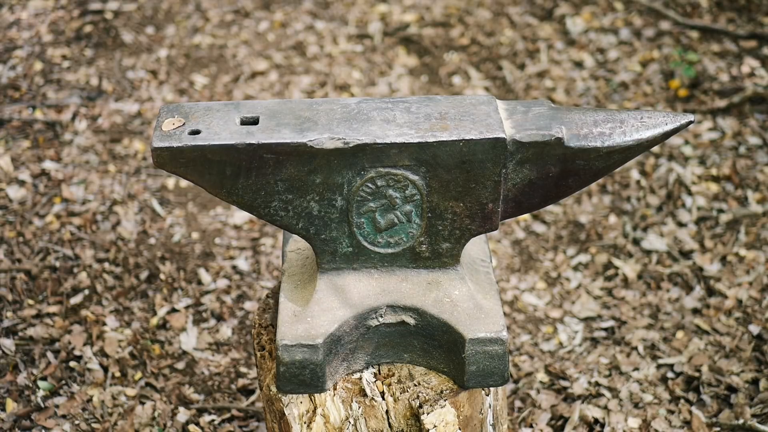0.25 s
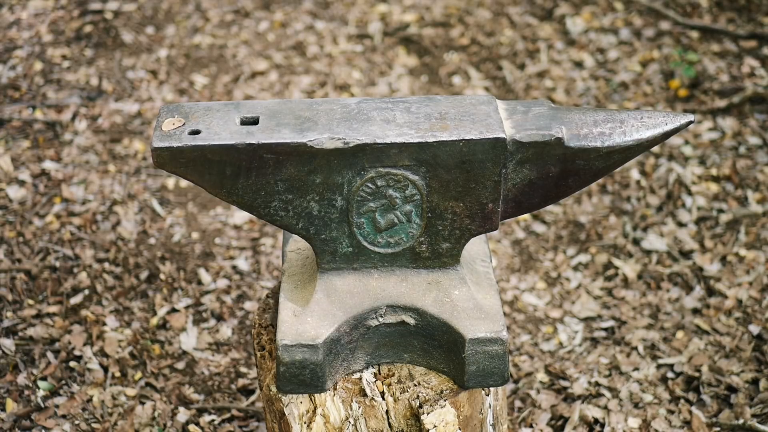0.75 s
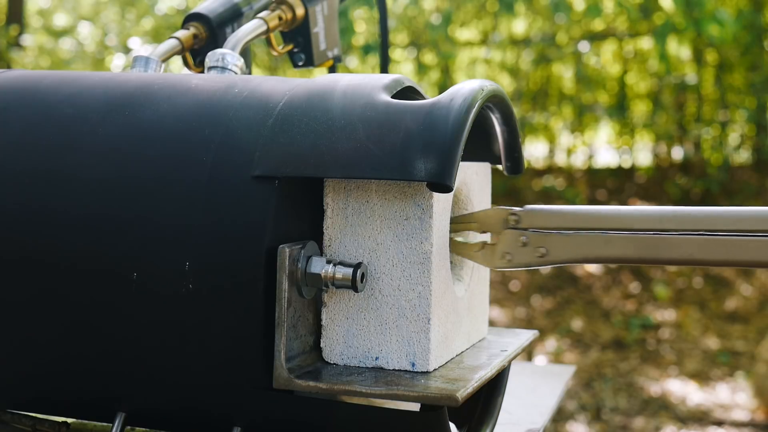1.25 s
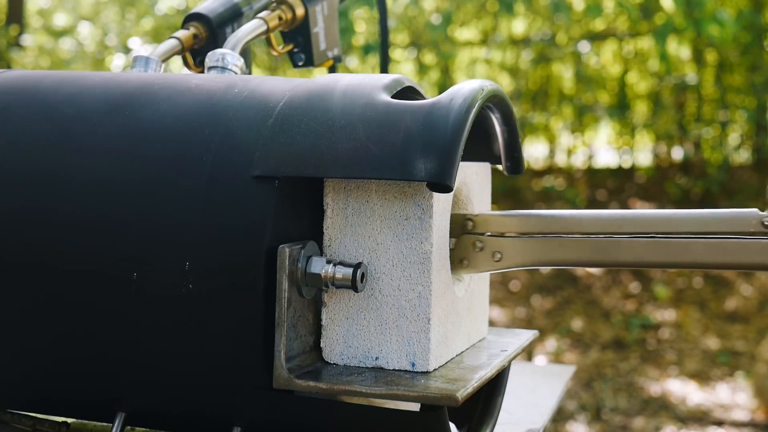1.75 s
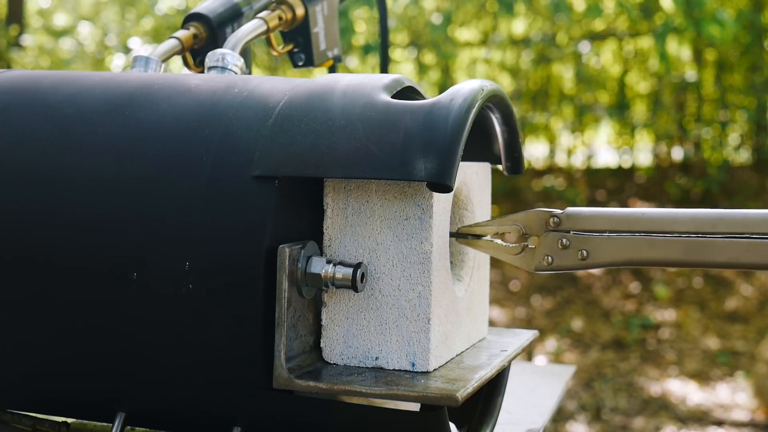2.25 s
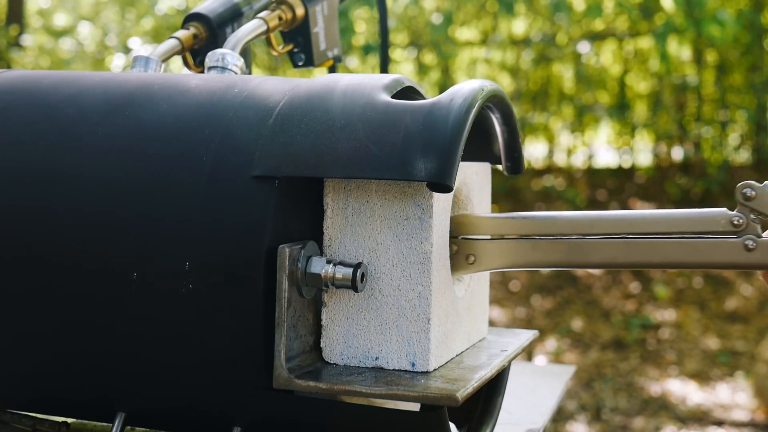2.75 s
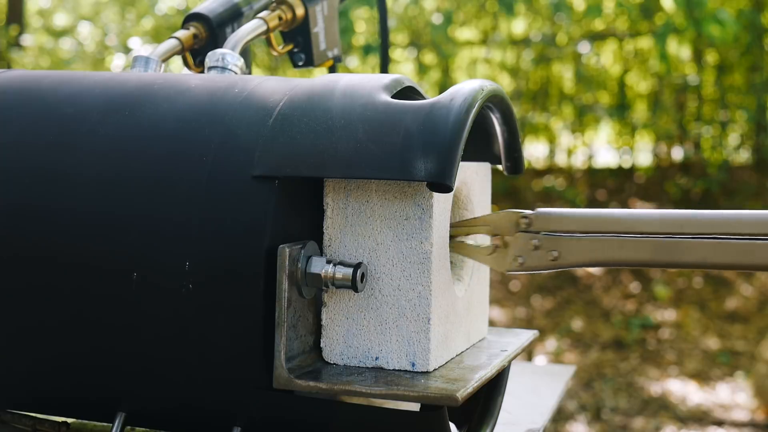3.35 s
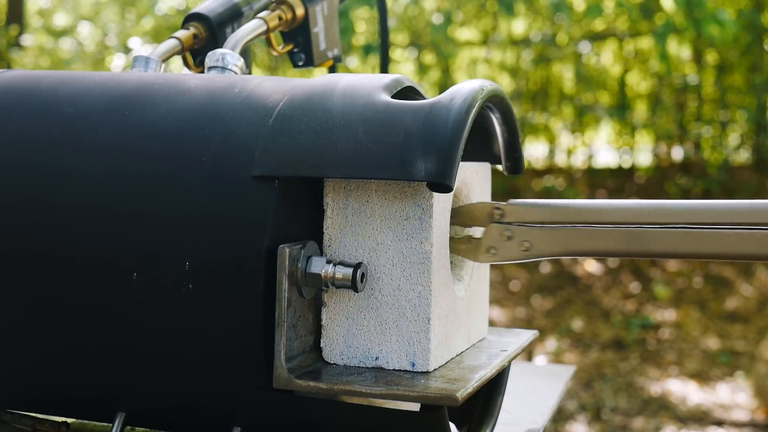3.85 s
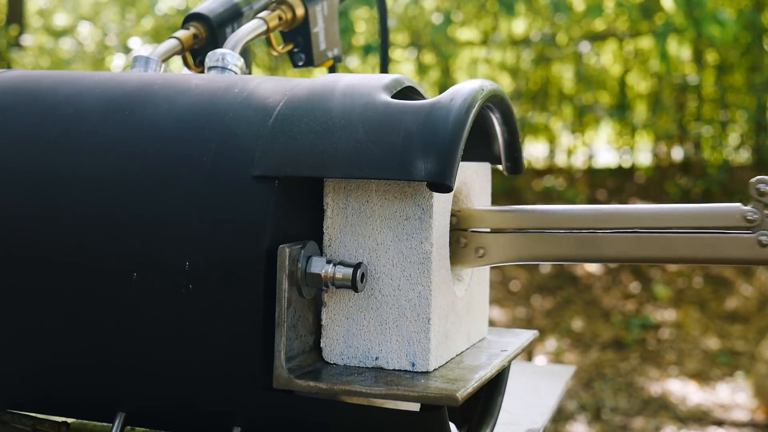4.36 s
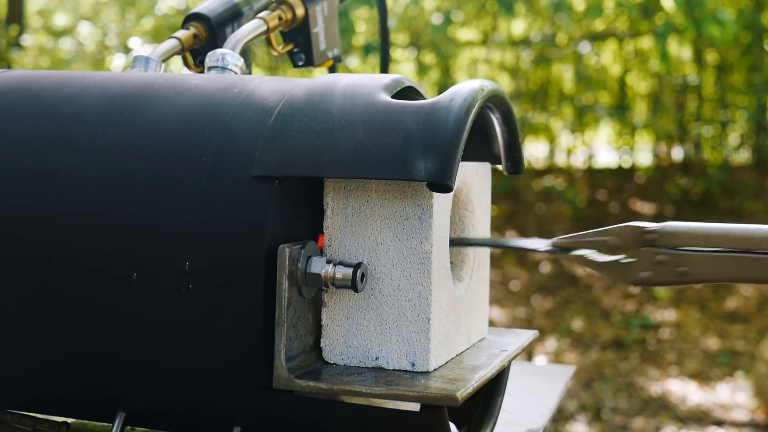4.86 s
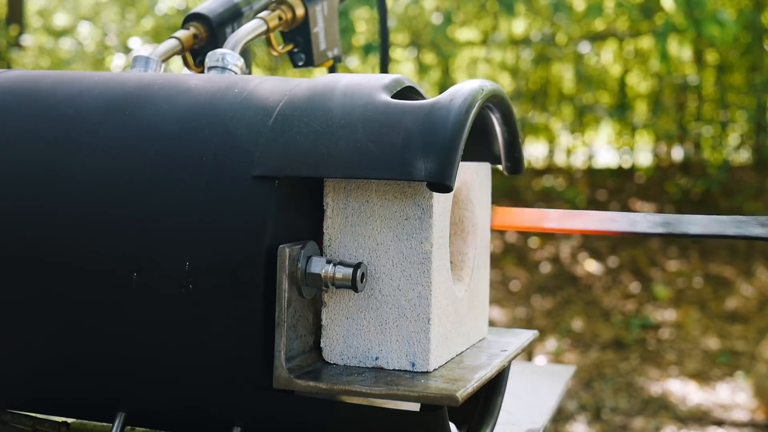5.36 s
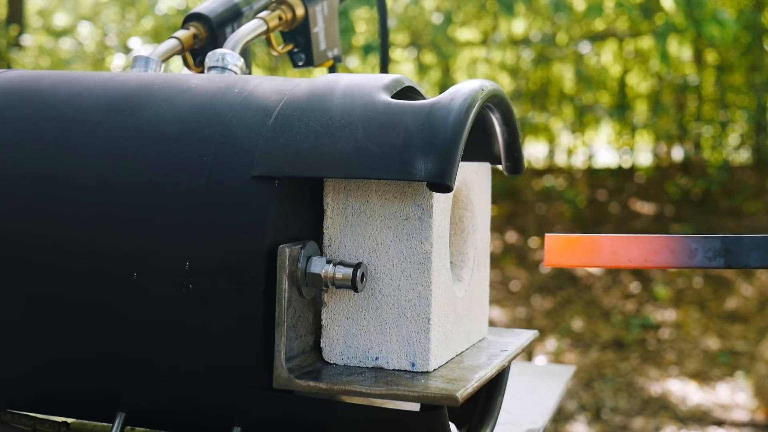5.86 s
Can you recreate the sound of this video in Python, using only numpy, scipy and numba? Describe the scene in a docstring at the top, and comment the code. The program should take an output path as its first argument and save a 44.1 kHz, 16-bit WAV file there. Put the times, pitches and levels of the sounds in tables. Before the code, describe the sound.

Outdoors, a faint low rumble and two tiny dry ticks come first while a gas forge rises within a second. It settles into a steady, hollow, low-mid roar with a bright, fluttering gas hiss on top. Near the end steel tongs touch brick with one faint, high, short ring. Close microphone, almost mono, little room sound.

```python
"""A small tube forge out of doors swells in over the first second, close to the microphone. Two dry ticks of
treble come early, over the faint rumble of the woods, which sinks in the first 1.6 s. Then the burner roars on:
the turbulent flame rings the chamber, the gas jet hisses in the burner pipe. A fast limiter shaves the peaks of
the roar, so the hiss ducks just after them; the stereo width flickers. Near the end, at about 5.2 s, tongs
touch the brick and their steel rings."""
import sys
import numpy as np
from scipy import signal
from scipy.fft import rfft, irfft
from scipy.io import wavfile
from scipy.ndimage import uniform_filter1d, minimum_filter1d
from numba import njit

SR = 44100
rng = np.random.default_rng(int(sys.argv[2]) if len(sys.argv) > 2 else 0)


def to_wav(sig):
    """Store sig (one row per channel, or 1-D mono) as 16-bit WAV at the path in sys.argv[1].

    Samples outside -1..1 are clipped; the rate is SR.
    """
    pcm = np.clip(np.atleast_2d(sig), -1, 1) * 32767
    pcm = np.round(pcm).astype(np.int16)
    wavfile.write(sys.argv[1], SR, pcm.T)  # frames by channels


def volts_from_db(level):
    """Convert decibel levels to linear amplitude ratios."""
    exponent = np.asarray(level, float) / 20
    return 10 ** exponent


N = 269010  # samples, 6.1 s
TIME = np.arange(N) / SR  # seconds


def curve(table, column=1):
    """Draws straight lines between the rows of a table, giving one column at every sample."""
    seconds = [row[0] for row in table]
    values = [row[column] for row in table]
    return np.interp(TIME, seconds, values)


def coloured(spectrum, modes=(), share=(0, SR)):
    """Noise with a smooth spectrum plus steep resonances; share keeps one slice (Hz), the whole has rms 1."""
    hz = np.fft.rfftfreq(N, 1 / SR) + 1  # 1 Hz up, to keep clear of zero
    corner_hz, db = np.transpose(spectrum)
    power = volts_from_db(2 * np.interp(np.log(hz), np.log(corner_hz), db, right=-120))
    for mode_hz, width_hz, mode_db in modes:
        detuning = (hz - mode_hz ** 2 / hz) / width_hz
        power = power + volts_from_db(2 * mode_db) / (1 + detuning ** 2 / 2.67) ** 2.485
    inside = (hz >= share[0]) & (hz < share[1])
    white = rfft(rng.standard_normal(N))
    return irfft(white * np.sqrt(power * inside / power.mean()), N)


def walk(rate):
    """A wandering level: random values held 1 / rate seconds, smoothed twice, standard deviation 1."""
    hold = int(SR / rate)
    steps = np.repeat(rng.standard_normal(N // hold + 1), hold)
    smooth = uniform_filter1d(uniform_filter1d(steps, hold), hold)[:N]
    return smooth / smooth.std()


def ring(start, hz, t60):
    """A sine that begins at a given second and dies away by 60 dB in t60 seconds."""
    age = np.maximum(TIME - start, 0)
    decay = np.exp(-np.log(1000) * age / t60)
    return (TIME >= start) * np.sin(2 * np.pi * hz * age) * decay


# The broad noise of the flame. Each row: frequency in Hz, relative level in dB per Hz.
FLAME_BED = [(20, -60), (50, -43), (100, -25), (150, -17), (300, -9.5), (800, -52), (1600, -27.5),
             (2000, -79), (3000, -61)]
# The notes the forge chamber favours. Each row: frequency in Hz, width in Hz, relative level in dB.
CHAMBER = [(223.3, 76, -10.5), (441.8, 144.3, 0.5), (635, 54, -13.5), (915, 80, -16.5), (1102, 156, -19),
           (1342, 260, -22)]


def flame(flutter):
    """Turbulent burning rings the chamber; its part above 750 Hz flutters with the jet."""
    start_db, rise_db_per_s = -28.7, 0.15  # before fade-in, flutter and limiter
    low = coloured(FLAME_BED, CHAMBER, (0, 750))
    high = coloured(FLAME_BED, CHAMBER, (750, SR))
    level = volts_from_db(start_db + rise_db_per_s * TIME)
    return level * (low + volts_from_db(0.65 * flutter) * high)


# How strong the gas hiss is, before flutter, fade-in and limiter.
# Each row: time in seconds, level of the low hiss in dB, level of the high hiss in dB.
JET = [(0, -49, -50), (.25, -48, -48), (.4, -45.5, -43), (.6, -43.5, -41.5), (.9, -44, -43),
       (1.5, -46, -45), (1.62, -41.5, -40.5), (1.72, -45, -41.5), (1.84, -41.5, -38), (1.95, -45.5, -42.5),
       (2.07, -42.5, -42.5), (2.28, -46.5, -46), (2.43, -41, -41.5), (2.53, -45, -44.5),
       (2.95, -43.5, -41.5), (3.3, -45, -41.5), (3.72, -47, -43.5), (3.85, -45, -41.5), (4.12, -43, -40),
       (4.38, -44.5, -41.5), (4.47, -45, -43.5), (5.1, -43, -41.5), (5.3, -44.5, -42), (5.5, -43, -42.5),
       (5.98, -45.5, -43), (6.1, -43.5, -41.5)]
# The broad noise of the gas jet. Each row: frequency in Hz, relative level in dB per Hz.
JET_BED = [(1200, -42), (2000, -23), (3000, -19), (3450, -19.5), (4300, -13), (7200, -13), (9800, -23),
           (11000, -23.5), (12900, -26), (14500, -25), (15500, -29)]
# The notes the burner pipe favours. Each row: frequency in Hz, width in Hz, relative level in dB.
PIPE = [(2493, 490, -12.5), (3758, 173, -8.5), (4897, 250, -1), (5280, 260, -3.5), (5970, 130, -11),
        (6670, 290, -7), (7830, 410, -2.5), (8710, 510, -7.5), (9350, 280, -16), (10430, 550, -19.5),
        (11560, 960, -20), (12300, 500, -23), (13500, 1300, -18), (15200, 500, -40)]


def jet(flutter):
    """Gas hisses through the burner pipe; all slices flutter together and each flickers alone."""
    low_db, high_db = curve(JET), curve(JET, column=2)
    registers = [  # edges of the slices in Hz, level in dB
        ([0, 3400, 4300, 5650], low_db),
        ([5650, 7200, 8300, 9800], high_db),
        ([9800, 12900, SR], high_db - 7),
    ]
    out = 0
    for edges, register_db in registers:
        sway_db = 0.79 * flutter + 0.6 * walk(21.99)
        hiss = 0
        for share in zip(edges, edges[1:]):
            flicker = volts_from_db(0.91 * walk(11))
            hiss = hiss + flicker * coloured(JET_BED, PIPE, share)
        out = out + volts_from_db(register_db + sway_db) * hiss / hiss.std()
    return out


# When the tongs touch the brick. Each row: start in seconds, level in dB.
TOUCHES = [(5.249, -49.5)]
# How the steel rings. Each row: frequency in Hz, level in dB added to the touch, time to fall 60 dB in s.
TONGS = [(2880, 0, .35), (3950, 4, .14)]


def tongs():
    """Each touch on the brick rings the steel of the tongs, a few fading sines at once."""
    out = np.zeros(N)
    for start, touch_db in TOUCHES:
        for hz, mode_db, t60 in TONGS:
            out += volts_from_db(touch_db + mode_db) * ring(start, hz, t60)
    return out


# Dry ticks. Each row: start in seconds, level in dB of the sine before noise roughens it,
# frequency in Hz, time in seconds for the sine to fall 60 dB.
TICKS = [(0.163, -33, 12100, 0.013), (0.221, -38, 10070, 0.027)]


def ticks():
    """Short dry bursts of treble: a fading sine multiplied by smoothed noise."""
    out = np.zeros(N)
    for start, db, hz, t60 in TICKS:
        grain = uniform_filter1d(rng.standard_normal(N), size=8)
        out += volts_from_db(db) * ring(start, hz, t60) * grain
    return out


def gate(share, block):
    """On for a given share of short blocks (in samples), off for the rest, with soft joins."""
    on = rng.random(N // block + 1) < share
    return uniform_filter1d(np.repeat(1. * on, block), block // 8)[:N]


# The sound that differs between left and right. Each row: frequency in Hz, relative level in dB per Hz.
SPREAD = [(20, -14), (40, -15), (139, -1), (300, -2), (427, -3), (637, 4), (1450, -2), (1910, -20),
          (2300, -15), (3220, -14), (4300, -9), (9800, -9), (13700, -10), (15500, -11)]


def width():
    """The stereo width flickers: it drops out band by band, and at times altogether."""
    open_db, block = -52, 1024  # level with every gate open and no fade; block in samples
    edges = [0, 350, 550, 900, 1700, 2400, 3400, 4000, 4600, 5200, 5700,
             6300, 6900, 7600, 8300, 9600, 11500, 13000, SR]  # Hz
    peaks = [(hz, width_hz, db + 2.5) for hz, width_hz, db in PIPE]
    bands = 0
    for low, high in zip(edges, edges[1:]):
        share_on = 0.9 if high < 400 else 0.5
        bands = bands + gate(share_on, block) * coloured(SPREAD, peaks, (low, high))
    return volts_from_db(open_db) * gate(0.75, 2 * block) * bands


# The tone of the woods. Each row: frequency in Hz, relative level in dB per Hz.
WOODS = [(20, -15), (35, -10.5), (59, -5), (80, -5), (130, -9), (300, -4.5), (800, -10.5), (1300, -11.5),
         (1800, -22), (3400, -25), (6000, -23), (15500, -37)]
# How loud the woods are, before their slow swell. Each row: time in seconds, level in dB.
WOODS_LEVEL = [(0, -49.5), (1, -53.5), (1.6, -58)]


def woods():
    """Distant rumble and rustle: shaped noise whose level swells slowly at random."""
    swell_db = 2.5 * walk(3)
    return volts_from_db(curve(WOODS_LEVEL) + swell_db) * coloured(WOODS)


# How the forge swells in. Each row: time in seconds, gain in dB.
FADE_IN = [(0, -16), (.3, -12.5), (.5, -6.5), (.8, -1.5), (1.05, -0.5)]


def fade_in():
    """The rising gain of the forge at every sample."""
    return volts_from_db(curve(FADE_IN))


def scene():
    """Everything sits in the centre; a faint unrelated share widens it."""
    flutter = walk(16)  # shared by flame and jet
    forge = flame(flutter) + jet(flutter)
    mid = fade_in() * forge + tongs() + ticks() + woods()
    side = fade_in() * width()
    return np.array([mid + side, mid - side])


@njit
def follow(x, attack, release):
    """Peak follower: moves a share of the way to each sample, attack when rising, release when falling."""
    env, e = np.empty(len(x)), 1e-9
    for i in range(len(x)):
        e += (x[i] - e) * (attack if x[i] > e else release)
        env[i] = e
    return env


def band_limit(x):
    """A steep low-pass at the top of the band."""
    return signal.sosfilt(signal.butter(12, 15740, fs=SR, output="sos"), x)


def record(dry):
    """A look-ahead limiter pulls both channels down together on the loudest cycles of the roar."""
    ceiling_db, ratio = -20, 11
    ahead_s, release_s = 0.001, 0.04
    ahead = int(ahead_s * SR) + 1  # samples
    # the forge is already faded in, so the ceiling rises with it and the roar is limited alike throughout
    ceiling = fade_in() * volts_from_db(ceiling_db)
    over = np.abs(dry).max(axis=0) / ceiling
    nearby_peak = -minimum_filter1d(-over, 2 * ahead + 1)
    env = follow(nearby_peak, 1., 1 / (release_s * SR))
    gain = np.minimum(1 / env, 1) ** (1 - 1 / ratio)
    return band_limit(dry * uniform_filter1d(gain, ahead))


dry = scene()
out = record(dry)
to_wav(out)
```